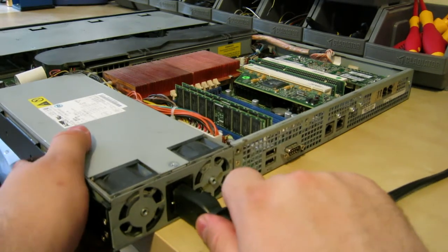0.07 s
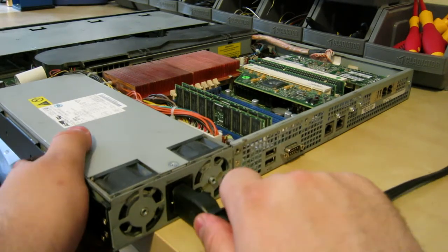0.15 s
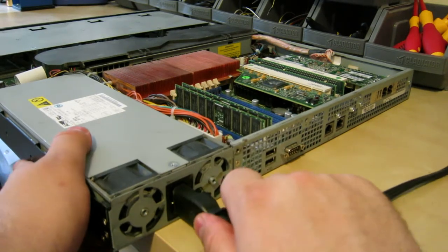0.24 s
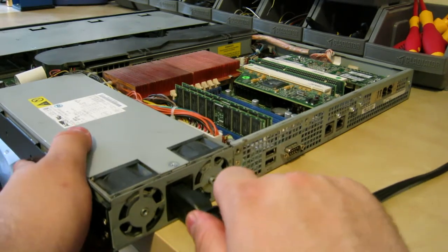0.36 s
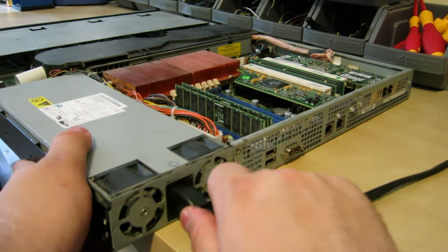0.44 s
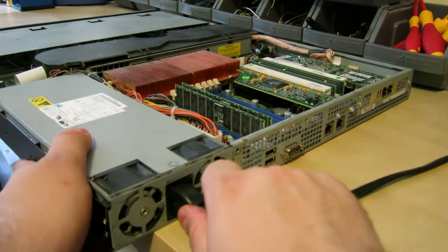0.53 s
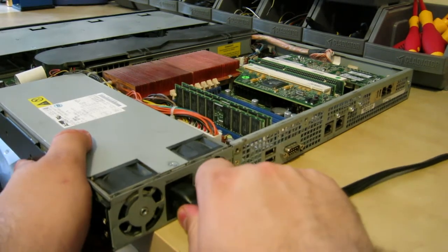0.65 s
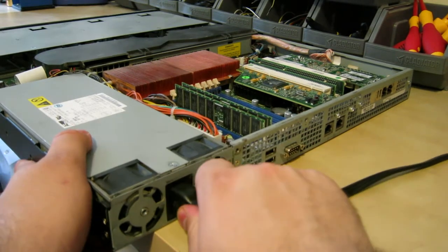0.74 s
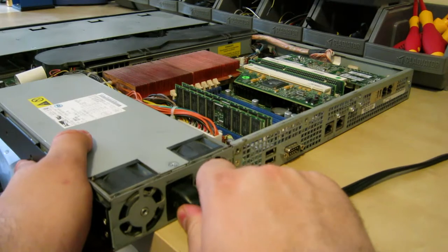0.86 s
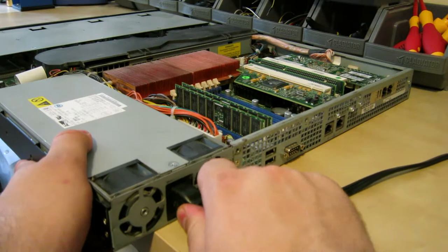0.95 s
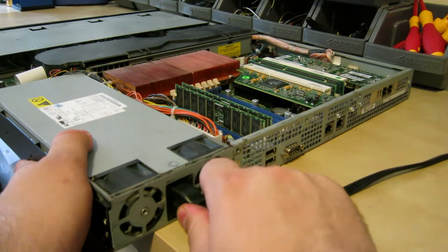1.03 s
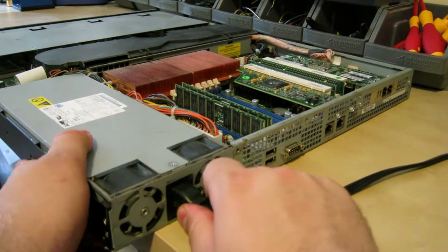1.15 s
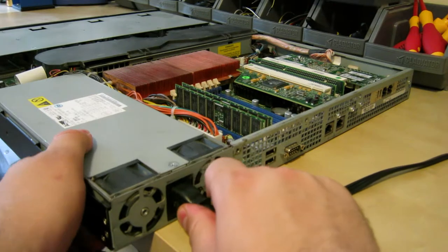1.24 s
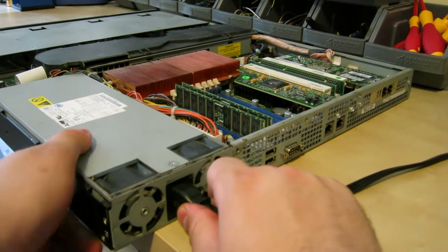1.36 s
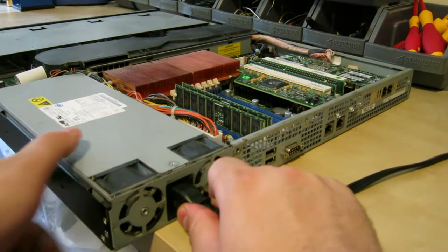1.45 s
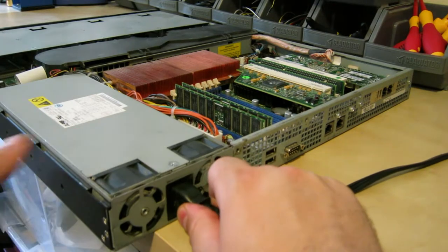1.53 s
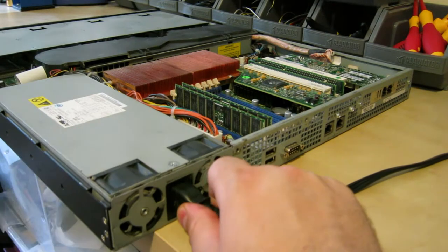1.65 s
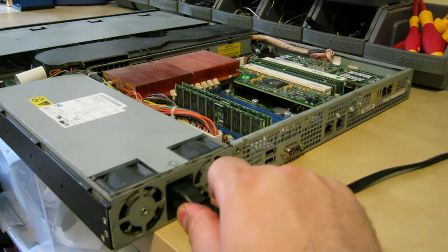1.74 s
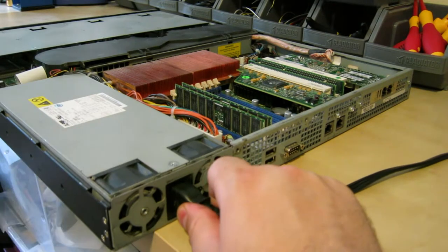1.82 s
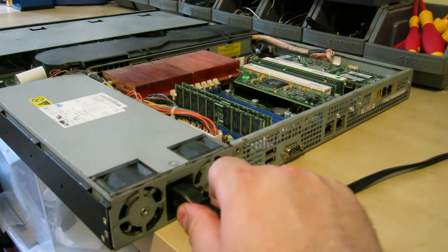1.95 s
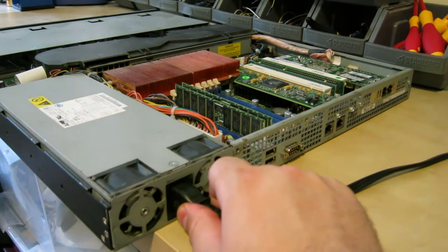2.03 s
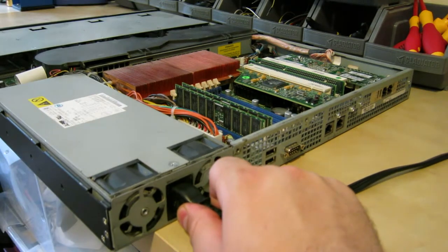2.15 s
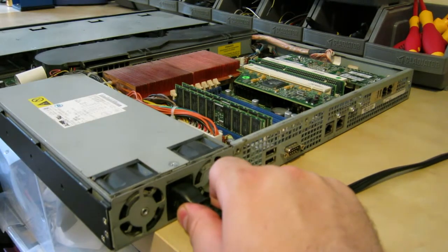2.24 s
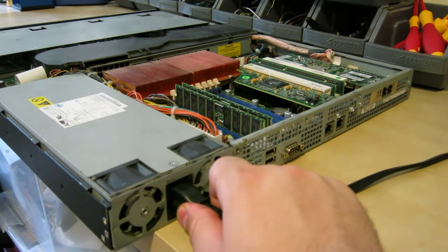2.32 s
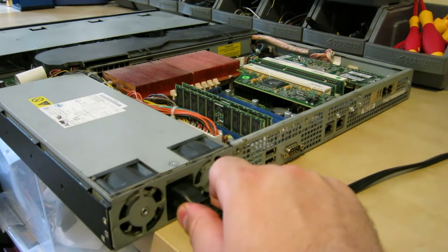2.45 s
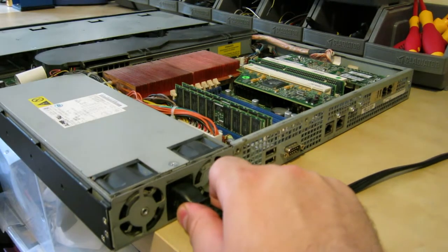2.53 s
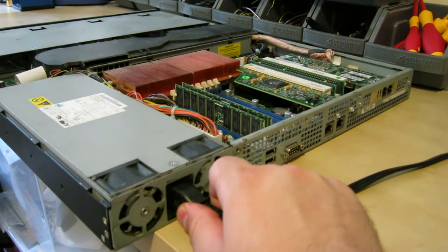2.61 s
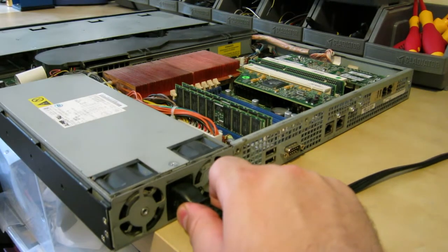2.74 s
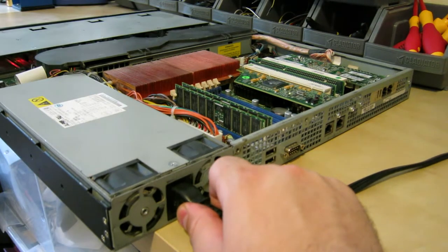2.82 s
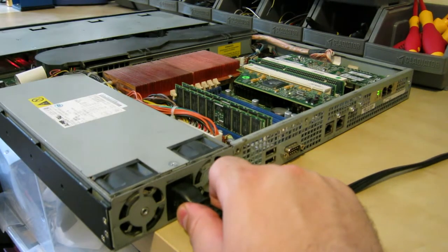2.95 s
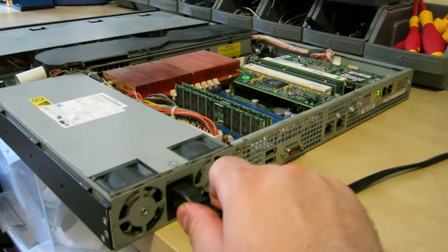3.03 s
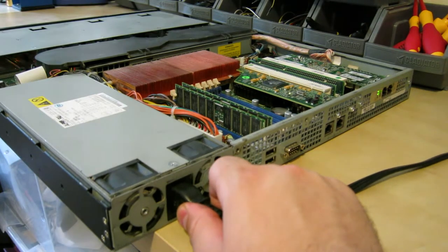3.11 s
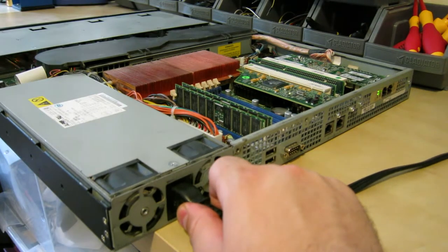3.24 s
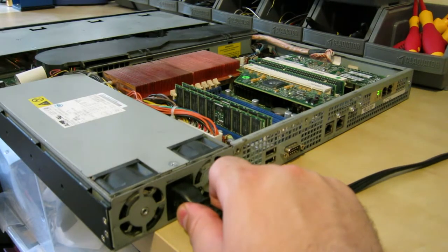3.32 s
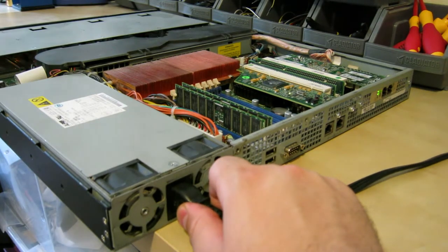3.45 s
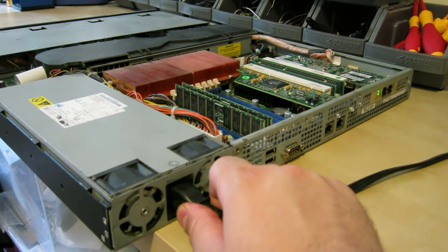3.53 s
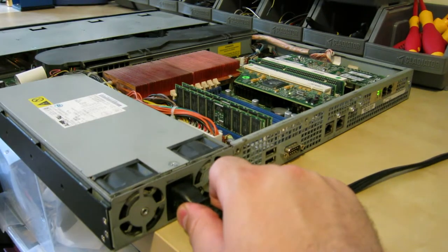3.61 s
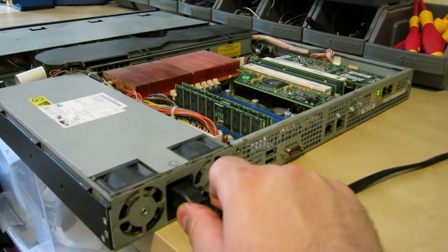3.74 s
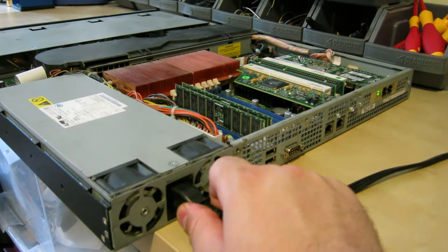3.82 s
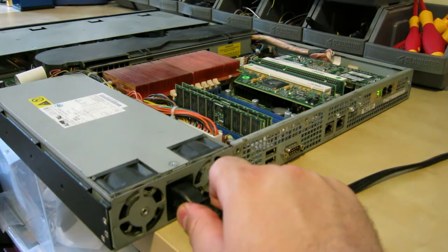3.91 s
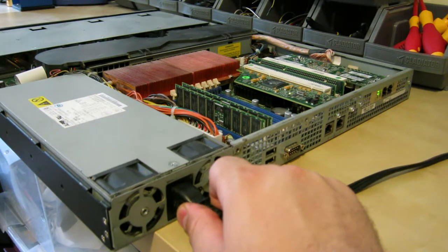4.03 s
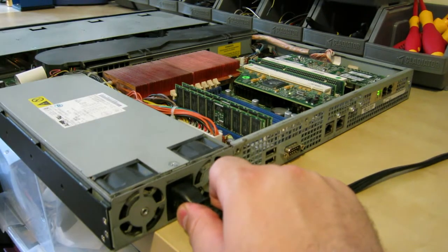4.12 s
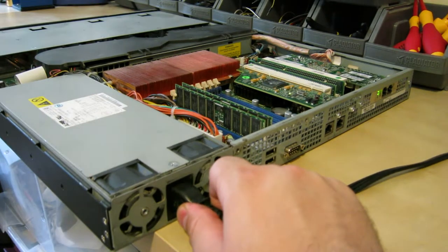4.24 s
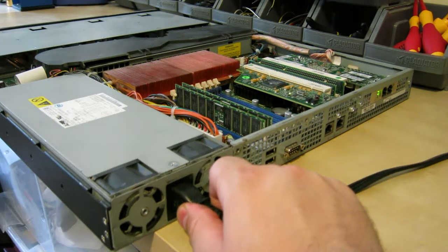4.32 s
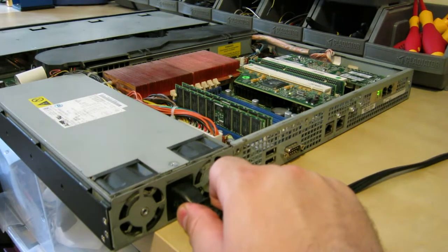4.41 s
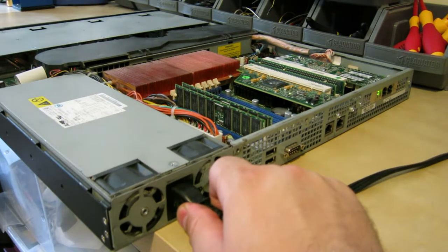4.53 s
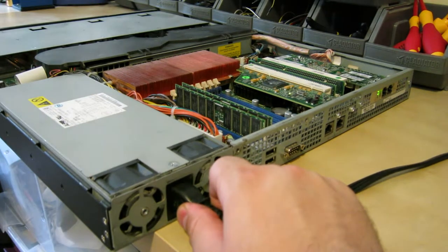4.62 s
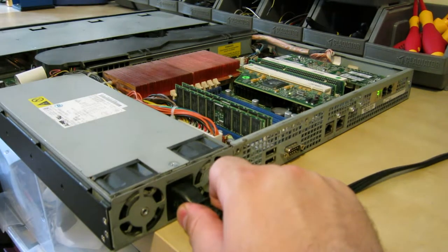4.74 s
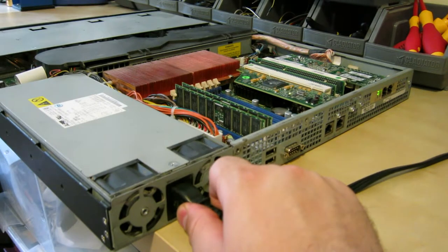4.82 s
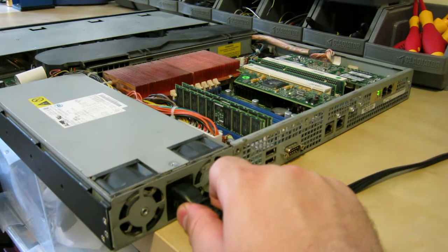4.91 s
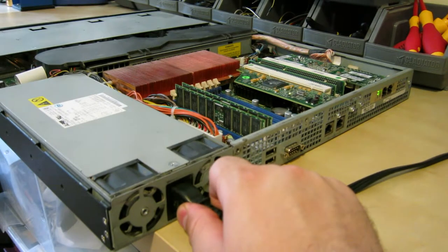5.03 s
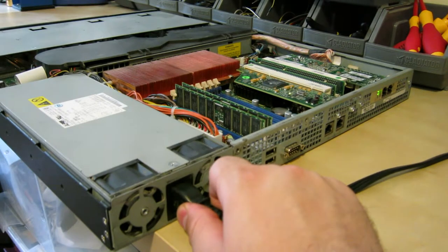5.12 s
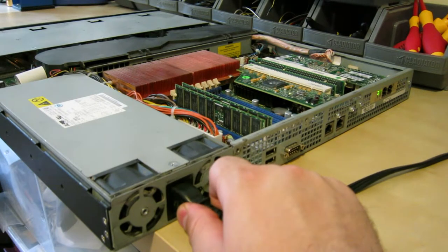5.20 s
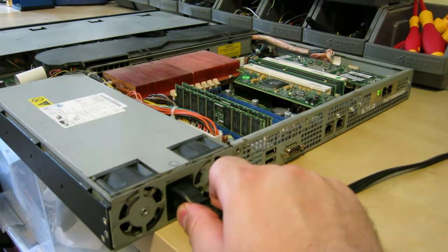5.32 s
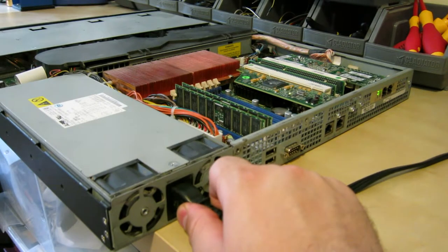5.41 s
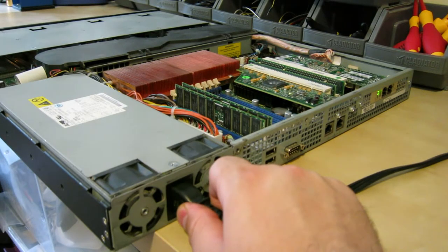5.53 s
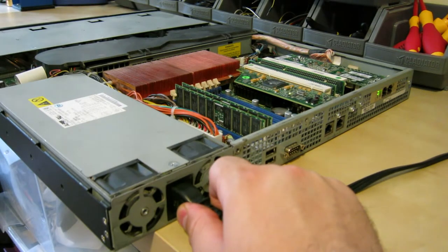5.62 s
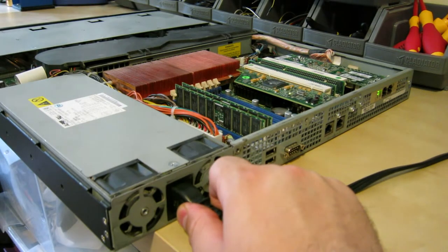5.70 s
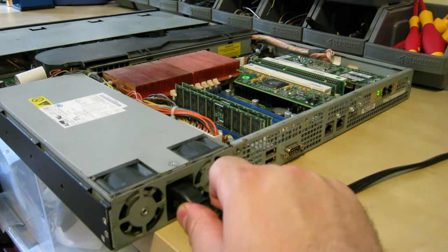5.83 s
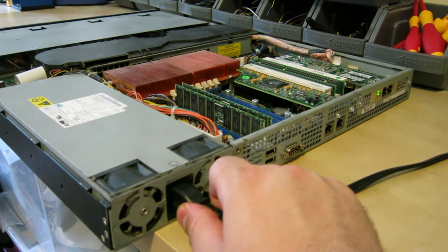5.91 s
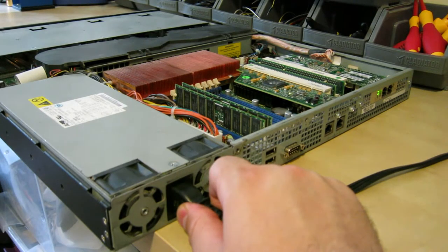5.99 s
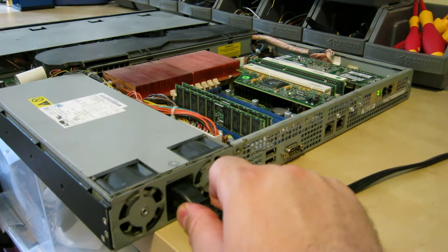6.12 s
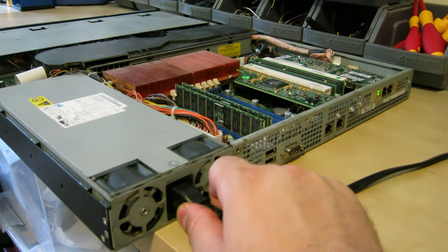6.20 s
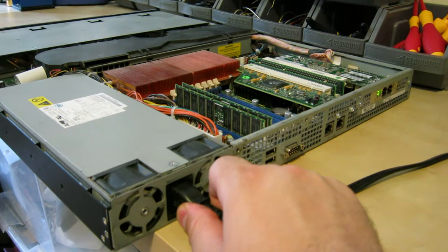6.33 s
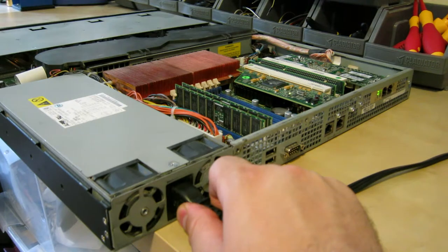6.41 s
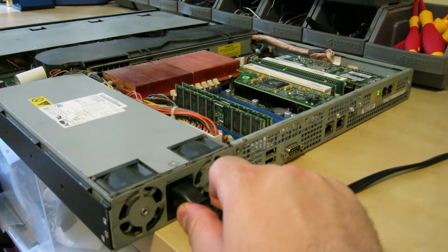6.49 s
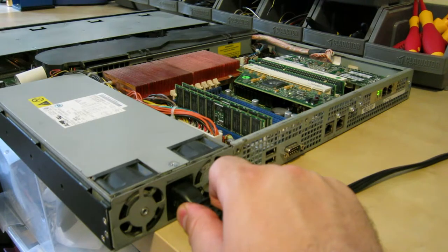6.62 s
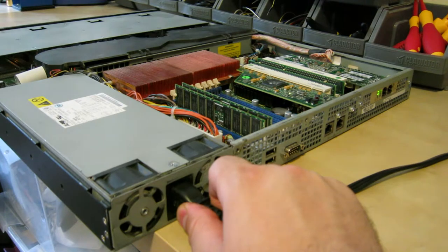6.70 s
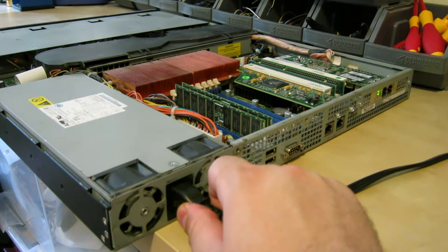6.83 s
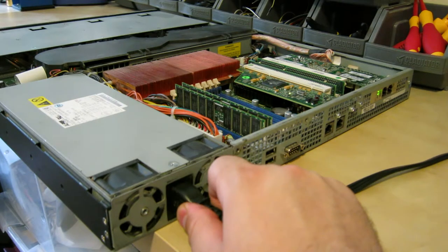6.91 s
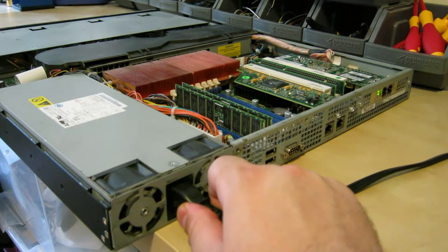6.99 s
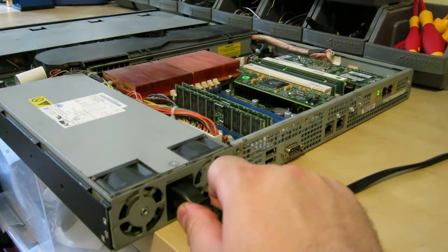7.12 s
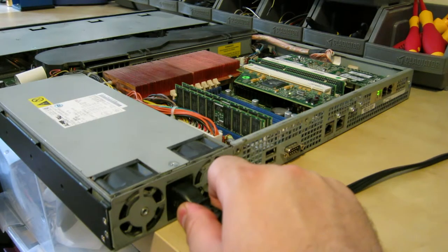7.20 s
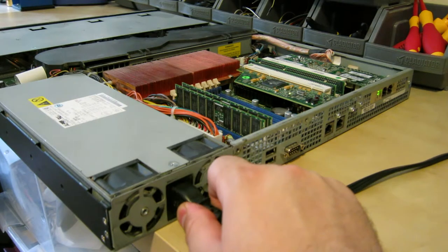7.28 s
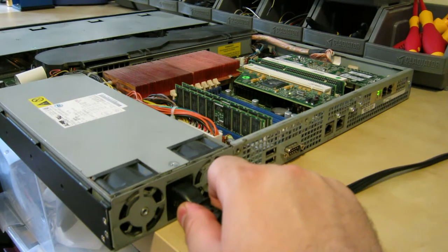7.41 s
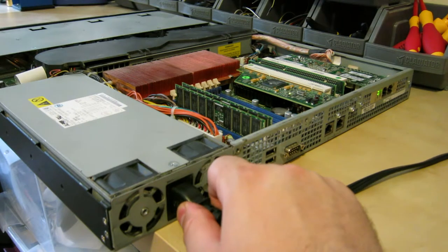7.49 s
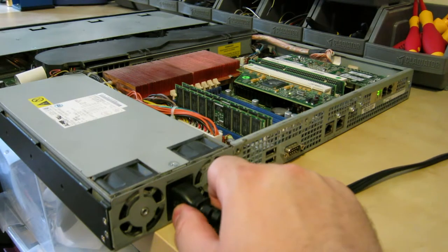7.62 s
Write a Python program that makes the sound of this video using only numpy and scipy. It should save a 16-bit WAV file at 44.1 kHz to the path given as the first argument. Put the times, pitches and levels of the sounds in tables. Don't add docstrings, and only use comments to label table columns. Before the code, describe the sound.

In a quiet humming room, plug knocks and finger ticks lead to two sharp relay snaps and a sudden sustained roar of server fans.

```python
import sys
import numpy as np
from scipy import signal
from scipy.fft import rfft, irfft, next_fast_len
from scipy.io import wavfile
from scipy.ndimage import uniform_filter1d

SR = 44100
rng = np.random.default_rng(int(sys.argv[2]) if len(sys.argv) > 2 else 0)


def wav_out(sig):
    wavfile.write(sys.argv[1], SR, np.round(np.clip(np.atleast_2d(sig).T, -1, 1) * 32767).astype(np.int16))


def undo_db(level):
    steps = np.asarray(level, float) / 20
    return 10 ** steps


N = 337423
T = np.arange(N) / SR

# time in seconds, rush level in dB.
FAN_EFFORT = [(2.95, -45), (3.04, -35.5), (3.11, -30), (3.24, -19.5), (3.32, -17.5), (3.95, -17.5),
              (4.2, -20), (4.7, -18.5), (4.85, -19), (5.8, -18.5), (6.8, -18.5), (7.1, -19.5), (7.66, -19)]


def evened(x):
    return x / np.sqrt(np.mean(x ** 2) + 1e-20)


def read(points, hz):
    f, value = np.transpose(points)
    return np.interp(np.log(hz + 1), np.log(f + 1), value)


def level(rows):
    s, db = np.transpose(rows)
    fade = np.clip(np.minimum(T - s[0], s[-1] - T) / 0.0085 + 1, 0, 1)
    return undo_db(np.interp(T, s, db)) * fade


def held(start, rise, hold, fall_db_per_s):
    rising = np.clip((T - start) / rise + 1, 0, 1)
    return rising * undo_db(-fall_db_per_s * np.maximum(T - start - hold, 0))


def resonate(x, hz, width):
    turn = np.exp(2j * np.pi * np.cumsum(hz * np.ones(x.shape[-1])) / SR)
    r = np.exp(-np.pi * width / SR)
    return 2 * (turn * signal.lfilter([1 - r], [1, -r], x / turn)).real


def twice(x, hz, width):
    return evened(resonate(resonate(x, hz, width), hz, width))


def air(spectrum, modes, same, lead=((1, 0), (2, 0)), tilt=((1, 0), (2, 0)), patchy_db=.5, ripple_db=1.23):
    frames, hz = N // 1024 + 5, np.fft.rfftfreq(4096, 1 / SR)
    a, b, c, d, patches = rng.standard_normal((frames, 2049, 5)).T
    patches = uniform_filter1d(patches, size=40, axis=0)
    patches = evened(uniform_filter1d(patches, size=4, axis=1))
    db = read(spectrum, hz)
    for f, width, boost_db in modes:
        db = db + boost_db / (1 + (2 * (hz - f) / width) ** 2)
    db = db + ripple_db * evened(uniform_filter1d(rng.standard_normal(len(hz)), size=5))
    alike = np.clip(read(same, hz), -1, 1)[:, None]
    left = a + 1j * b
    delayed = left * np.exp(-1j * read(lead, hz))[:, None]
    right = alike * delayed + np.sqrt(1 - alike ** 2) * (c + 1j * d)
    side = undo_db(read(tilt, hz) / 2)[:, None]
    z = np.array([left * side, right / side]) * undo_db(db[:, None] + patchy_db * patches)
    return evened(signal.istft(z, nperseg=4096, noverlap=3072)[1][:, :N])


def room():
    # time in seconds, level in dB.
    rumble = [(0, -45), (.65, -44.5), (1.3, -45.5), (1.9, -47.5), (2.85, -46)]
    # frequency in Hz, strength in dB per Hz.
    room_air = [(24, -47), (40, -18.5), (64, -15), (87, -12), (171, -0.5), (312, -5), (363, -10),
                (503, -12.5), (1150, -18.5), (1900, -26.5), (2050, -28), (6020, -35.5), (16000, -44.5)]
    # frequency in Hz, width in Hz, boost in dB.
    room_modes = [(90, 21, 10.5), (129, 9.4, 8.5), (177, 14, 2.5), (236, 8.6, 7), (313, 5.4, 9.5),
                  (412.3, 10, 11), (515.5, 12, 10.5)]
    # frequency in Hz, likeness from 0 to 1.
    room_same = [(25, .3), (60, 0.31), (130, 0.79), (290, 0.8), (640, 0.34), (1400, 0.), (3100, 0.),
                 (6800, 0.35), (15000, 0)]
    # frequency in Hz, wander width in Hz, level in dB.
    hums = [
        (58.6, 4., -59),
        (1836, 12., -67),
        (6191, 16., -83),
    ]
    hiss_db, rumble_swell_db = -43.5, 0.84
    swell = sum(np.sin(2 * np.pi * (f * T + rng.random())) / np.sqrt(f) for f in np.geomspace(1.5, 8, num=12))
    noise = air(room_air, room_modes, room_same, patchy_db=1.0, ripple_db=1.)
    low = signal.oaconvolve(noise, signal.firwin(127, 900, fs=SR)[None], "same")
    rumble_gain = undo_db(np.interp(T, *np.transpose(rumble)) + rumble_swell_db * evened(swell))
    out = undo_db(7.0) * (rumble_gain * low + undo_db(hiss_db) * (noise - low))
    for hz, width, db in hums:
        wander = twice(rng.standard_normal(N), hz, width)
        out += undo_db(db) * (np.sin(2 * np.pi * hz * T) + .6 * wander)
    return out


def rubbing():
    # hardest moment in seconds, build-up in seconds,
    # die-away in seconds, level in dB, contact (0 casing, 1 plug body, 2 pins).
    strokes = [(.04, 0.056, .13, -44, .05), (.415, 0.033, 0.058, -39, 0.62),
               (.57, 0.16, 0.055, -39.5, 0.19), (.64, .14, 0.058, -37.5, 0.32), (.63, .2, .07, -50, 2.1),
               (1.98, .04, .15, -64, 1.6), (2.045, .02, .14, -47, 0.18), (2.17, 0.21, .3, -49.5, 0.47),
               (2.35, .3, 0.25, -52, .3), (2.925, 0.075, 0.19, -38.5, 0.45), (2.93, .1, .4, -58, 1.9)]
    # start in seconds, hold in seconds, level in dB.
    groans = [
        (.04, .14, -37.5),
        (.265, .05, -38),
    ]
    stroke_depth_db = 20
    off_contact_db = 20
    slips = rng.standard_normal(N) * undo_db(2.8 * np.minimum(rng.exponential(1, N), 4))
    dull = evened(twice(slips, 800, 1300) + 0.26 * twice(slips, 610, 200))
    middle = evened(twice(slips, 2870, 1900) + 1.0 * twice(slips, 1640, 900) + .5 * twice(slips, 4600, 4000))
    bright = evened(twice(slips, 13200, 3500) + 1.5 * twice(slips, 7300, 5000))
    push = sum(undo_db(db) * held(s, .03, hold, fall_db_per_s=350) for s, hold, db in groans)
    out = twice(rng.standard_normal(N), 215, 25) * push
    for s, rise, fall, db, contact in strokes:
        force = undo_db(db - stroke_depth_db * np.maximum((s - T) / rise, (T - s) / fall))
        for k, part in enumerate((dull, middle, bright)):
            out += force * undo_db(-off_contact_db * (k - contact) ** 2) * part
    return out


def clicks():
    # time in seconds,
    # peak in dB, ring frequency in Hz, ring in dB against the crack.
    hand_clicks = [(.1585, -40, 8000, -11), (.353, -40, 6000, -10), (.4008, -11.5, 4880, -15),
                   (.4014, -12, 2210, 0.5), (.4025, -12.5, 1500, 12), (.404, -21.5, 900, 2),
                   (.412, -21.5, 393, -1), (.5902, -10.5, 12700, 2), (.591, -21, 3900, 7),
                   (.5935, -30, 7500, -9), (.6055, -25.5, 1140, 6), (.6512, -22.5, 2100, 9),
                   (.6898, -19, 8300, -7),
                   (1.5067, -12, 12800, -6), (1.5070, -14, 4600, -9), (1.5072, -16, 6500, 13),
                    (1.51, -24, 3000, 1), (1.971, -28.5, 9400, -3), (1.976, -34, 6500, -10),
                    (2.003, -40, 8000, -10), (2.0365, -33.5, 2880, -7), (2.037, -38, 1110, 6),
                    (2.041, -33, 480, 9), (2.163, -34, 3150, 8)]
    relay_snaps = [
        (2.885, -11, 5950, -13),
        (2.8863, -8.5, 3700, 2),
        (2.8929, -12.5, 2450, 5),
        (2.9744, -9, 5600, 8),
        (2.974, -16, 3930, 2),
        (2.975, -19, 8300, -3),
        (2.976, -26, 1900, 0),
        (2.979, -13, 3900, -1),
    ]
    rows = hand_clicks + relay_snaps
    out, t = np.zeros(N), np.arange(5000) / SR
    rise = 1 - np.exp(-t / 0.00035)
    for s, db, ring_hz, ring_db in rows:
        grit = rng.standard_normal(5000)
        crack_hz = min(1.57 * ring_hz, 12800)
        t60 = 0.012 + 0.18 * (400 / ring_hz) ** 1.43
        snap = 0.87 * np.sin(2 * np.pi * crack_hz * t) * np.exp(-t / 0.0011)
        crack = (snap + twice(grit, crack_hz, 0.49 * crack_hz)) * undo_db(-60 * t / (0.46 * t60))
        ring = 0.31 * np.sin(2 * np.pi * ring_hz * t) + 0.84 * twice(grit, ring_hz, 0.25 * ring_hz)
        both = rise * (crack + ring * undo_db(ring_db - 60 * t / t60))
        out[round(s * SR):][:5000] += undo_db(db) * both / abs(both).max()
    return out


def echoes(x):
    # frequency in Hz, seconds for the echo to fall 60 dB.
    click_room = [(300, 0.21), (1500, 0.24), (6000, .17), (10000, 0.16), (14000, 0.14)]
    taps = np.zeros((2, SR // 2))
    slots = np.arange(120, SR // 2 - 20, 20)
    at = slots + rng.integers(0, 20, (2, len(slots)))
    np.put_along_axis(taps, at, rng.choice([-1., 1.], at.shape), axis=1)
    hz, t, z = signal.stft(taps, SR, nperseg=256)
    tail = signal.istft(z * undo_db(-60 * t / read(click_room, hz)[:, None]), SR, nperseg=256)[1]
    return signal.fftconvolve(x[None], tail / np.linalg.norm(tail[0]), axes=1)[:, :N]


def whine():
    shape = held(2.892, rise=.006, hold=0.055, fall_db_per_s=64)
    return undo_db(-40.5) * shape * twice(rng.standard_normal(N), 11350, 500)


def fans():
    # frequency in Hz, strength in dB per Hz.
    blade_rush = [(180, -18.5), (300, -41), (398, -29.5), (486, -6), (828, 1), (1320, -9), (1530, -10.5),
                  (2100, -2.5), (2570, -10), (4370, -15.5), (8360, -14.5), (10700, -16.5), (13800, -26),
                  (15200, -36), (16000, -87.5)]
    # frequency in Hz, width in Hz, boost in dB.
    duct = [(480, 19, 1.5), (625, 88, 3.5), (853, 41, 0.5), (1168, 72, 3), (1293, 133, 5.5), (1773, 200, 3),
            (2115, 120, 2), (2340, 380, 3.5), (2750, 150, 3.5), (3080, 116, 4.5), (3303, 80, 6.5),
            (3610, 63, 3.5), (3900, 74, 4), (4986, 170, 4.5), (6380, 280, 2), (8300, 220, 2),
            (10730, 370, 1), (11700, 400, -2.5)]
    # frequency in Hz, strength in dB per Hz.
    fan_body = [(24, -60), (40, -44), (75, -22.5), (123, -2.5), (189, -10), (232, 3), (395, -7.5),
                (442, -13.5), (460, -1), (600, -27), (1010, -120)]
    # frequency in Hz, likeness from 0 to 1.
    fan_same = [(25, .8), (60, 0.83), (130, 0.95), (290, 0.97), (600, 1), (860, 0.95), (1200, 0.99),
                (1500, .96), (2300, .975), (4000, 0.93), (5500, 0.95), (8000, 0.79), (15000, 0.5)]
    # frequency in Hz, lead in radians.
    fan_lead = [(100, 0.), (4000, 0.1), (7000, 0.49), (8500, 0.51), (11000, 0.92), (13400, 0.), (16000, 0.)]
    # frequency in Hz, left minus right in dB.
    fan_tilt = [(60, -4), (180, -1.5), (550, -0.5), (1650, -0.5), (4970, 0.5), (15000, 3)]
    full_db, settle_s = -18.5, 1.22
    shaft_from_hz, shaft_to_hz = 119, 224
    rush = air([(30, -75)] + blade_rush, duct, fan_same, fan_lead, fan_tilt, patchy_db=0.58, ripple_db=1.04)
    start = FAN_EFFORT[0][0]
    under_db = np.interp(T, *np.transpose(FAN_EFFORT)) - full_db
    unsettled = np.exp(-np.maximum(T - start, 0) / settle_s)
    treble_db = -5 + 0.25 * under_db - 2.5 * unsettled
    for edge_hz, share in ((3000, 0.56), (1300, 0.51)):
        high_pass = signal.firwin(41, edge_hz, pass_zero=False, fs=SR)
        above = signal.oaconvolve(rush, high_pass[None], "same")
        rush = rush + above * (undo_db(share * (treble_db + 6.5)) - 1)
    drone = air(fan_body, [], fan_same, tilt=fan_tilt, patchy_db=1.26)
    shaft_hz = shaft_to_hz + (shaft_from_hz - shaft_to_hz) * unsettled
    rotor = twice(rng.standard_normal(N), shaft_hz, 10.0)
    shaking = np.clip((T - start) / 0.08, 0, 1) * undo_db(-35.5 + 0.48 * under_db)
    singing = undo_db(-6.5) * held(2.99, .03, 0, fall_db_per_s=24) + undo_db(-14.5)
    lead_in = singing * twice(rng.standard_normal(N), 845.6, 72)
    return level(FAN_EFFORT) * (lead_in + undo_db(2.0) * rush) + shaking * (drone + undo_db(-12.0) * rotor)


def ducking():
    over_db = np.maximum(20 * np.log10(level(FAN_EFFORT) + 1e-9) + 37.0, 0)
    return undo_db(-.6 * uniform_filter1d(over_db, size=4000))


def puffs():
    # start in seconds, length in seconds, level in dB, top frequency in Hz.
    gusts = [
        (3.765, 0.084, -28.5, 230),
        (4.725, 0.08, -38, 150),
        (5.253, 0.087, -46, 140),
        (5.702, 0.057, -44, 110),
        (6.18, .07, -47, 110),
    ]
    out = np.zeros((2, N))
    for s, length, db, top_hz in gusts:
        eddies = rng.standard_normal((2, 9000))
        for _ in range(2):
            eddies = twice(eddies, 0.6 * top_hz, 1.4 * top_hz)
        a, b = eddies[:, -round(length * SR):]
        lumps = evened(np.array([a + 0.53 * b, -a + 0.59 * b])) * signal.windows.tukey(len(a), .4)
        out[:, round(s * SR):][:, :len(a)] += undo_db(db) * lumps
    return out


def scene():
    near = clicks() + rubbing() + whine()
    tail = echoes(near)
    hand = near * undo_db([[.7], [-.7]]) + undo_db(-10.5) * (tail + 0.17 * tail[::-1])
    return hand + puffs() + ducking() * room() + fans()


def low_pass(x):
    return signal.sosfilt(signal.butter(12, 16510, fs=SR, output="sos"), x)


def record(dry):
    # frequency in Hz, gain in dB.
    mic = [(20, -24), (45, 4), (80, -1), (12000, 1), (14500, -3.5), (15500, -10), (16500, -14),
           (17200, -50), (22050, -60)]
    size = next_fast_len(N)
    mic_gain = undo_db(read(mic, np.fft.rfftfreq(size, 1 / SR)))
    coloured = irfft(rfft(dry, size) * mic_gain, size)[:, :N]
    ceiling = .85
    mix = coloured / (1 + (coloured / ceiling) ** 4) ** (1 / 4)
    return low_pass(mix)


dry = scene()
out = record(dry)
wav_out(out)
```